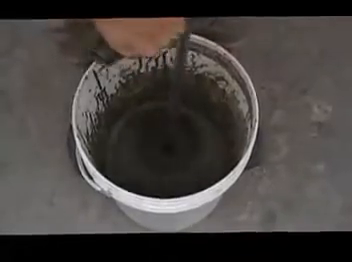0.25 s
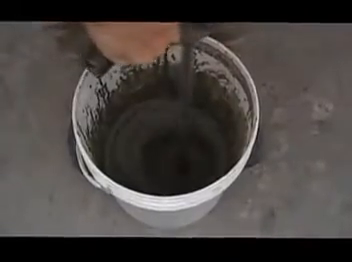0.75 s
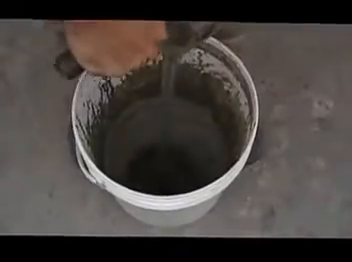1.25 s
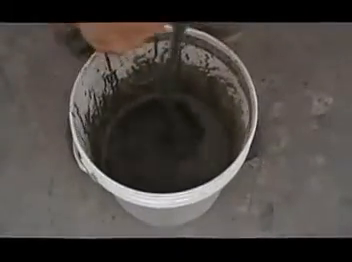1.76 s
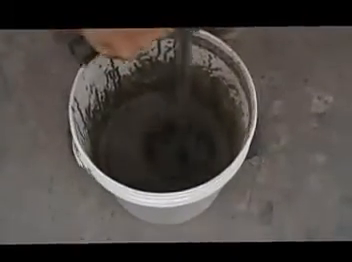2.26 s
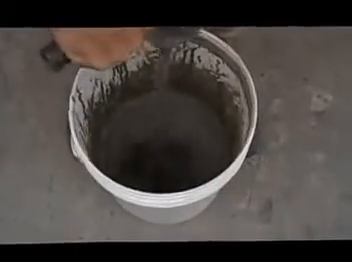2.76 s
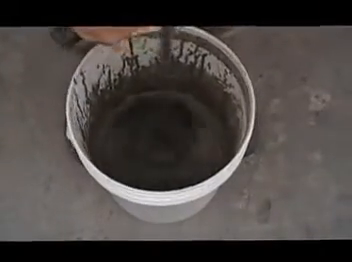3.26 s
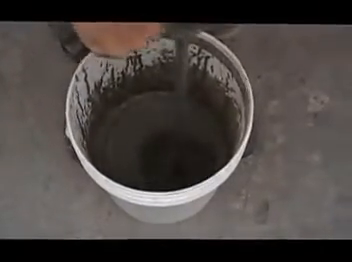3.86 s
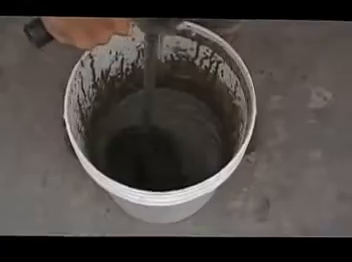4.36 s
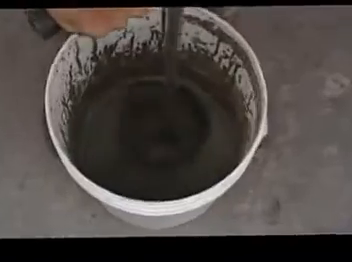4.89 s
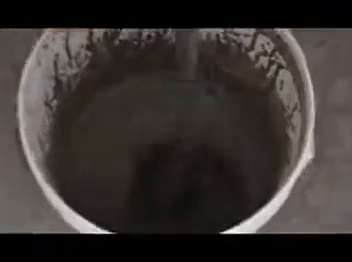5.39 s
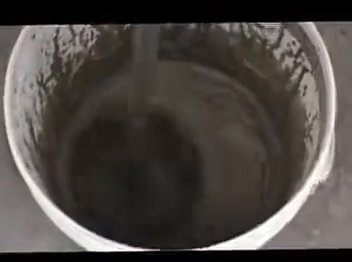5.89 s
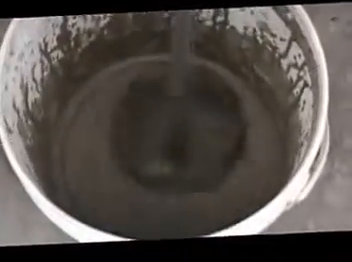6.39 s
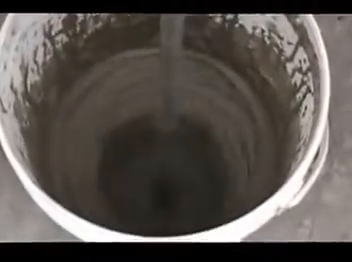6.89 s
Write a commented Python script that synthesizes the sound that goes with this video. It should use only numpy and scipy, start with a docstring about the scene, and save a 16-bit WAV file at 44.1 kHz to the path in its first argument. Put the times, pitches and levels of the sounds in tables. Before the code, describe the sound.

A drill with a mixing paddle revs up fast and holds a hissing, rasping whine while thick paste churns and slaps a bucket.

```python
"""In a room with short reflections, an electric drill turns a mixing paddle in a plastic bucket of mortar.
It coasts for a moment, is switched on and runs up to a whine at multiples of its shaft speed, made of
tones with rough skirts, over shaped noise for fan and brushes. The paddle is led round the bucket:
churning and gear rattle swell near the wall, while listed slaps ring the bucket as decaying tones."""
import sys
import numpy as np
from scipy import signal
from scipy.fft import rfft, irfft
from scipy.io import wavfile
from scipy.ndimage import uniform_filter1d

SR = 44100
rng = np.random.default_rng(int(sys.argv[2]) if len(sys.argv) > 2 else 0)


def to_wav(s):
    """Save 16-bit WAV."""
    ch = np.atleast_2d(s).T  # columns
    pcm = np.round(np.clip(ch, -1, 1) * 32767)  # PCM
    wavfile.write(sys.argv[1], SR, pcm.astype(np.int16))


N = 314874
TIME = np.arange(N) / SR  # s
BINS = np.fft.rfftfreq(N, 1 / SR)  # Hz


def amp(db):
    """Decibels to gain."""
    return 10 ** (np.asarray(db) / 20)


def unit(x):
    """Scales to rms 1."""
    return x / np.sqrt(np.mean(abs(x) ** 2) + 1e-20)


def curves(rows):
    """Every column of a table as a curve over time."""
    s, *columns = np.transpose(rows)
    return [np.interp(TIME, s, column) for column in columns]


def spectrum(points):
    """Joins points on a log-frequency axis."""
    hz, value = np.transpose(points)
    return np.interp(np.log(BINS + 1), np.log(hz), value)


def colour(x, db):
    """Filters by a gain for each frequency."""
    return irfft(rfft(x) * amp(db), N)


def noise(points):
    """Noise of rms 1 with the given spectrum."""
    return unit(colour(rng.standard_normal(N), spectrum(points)))


def wander(rate_hz):
    """Smooth chance of rms 1, moving up to about this rate."""
    steps = rng.standard_normal(N // 16 + 1)  # one step every 16 samples
    hz = np.fft.rfftfreq(len(steps), 16 / SR)
    slow = irfft(rfft(steps) / np.sqrt(1 + (hz / rate_hz) ** 4), len(steps))
    return unit(np.interp(np.arange(N), np.arange(len(steps)) * 16, slow))


def fuzzy(angle, width_hz):
    """A tone smeared into a narrow band, with rms about 1."""
    return wander(width_hz) * np.cos(angle) + wander(width_hz) * np.sin(angle)


def tone(angle, rough, width_hz):
    """A clean line of rms about 1 with a rough skirt."""
    clean = np.sqrt(2) * np.sin(angle + rng.uniform(0, 2 * np.pi))
    return clean + rough * fuzzy(angle, width_hz)


def bump(s, width_s):
    """A smooth swell of height 1 around time s."""
    return np.exp(-.5 * ((TIME - s) / width_s) ** 2)


def bell(hz, width_hz):
    """A resonance curve of height 1."""
    return 1 / (1 + (2 * (BINS - hz) / width_hz) ** 2)


def add(mix, s, sound):
    """Mixes a sound in at time s."""
    part = mix[max(round(s * SR), 0):][:len(sound)]
    part += sound[:len(part)]


FULL_SPEED = 414  # reference speed, turns per s
COAST_SPEED, COAST_S = 215, .74  # speed at the start, turns per s; time constant of the slowing, s
SWITCH_ON_S = .1915
# run-up: a quick kick takes this share of the climb, a slow pull the rest
KICK_SHARE, KICK_S, CLIMB_S = .105, .04, .256
# speed that the load of the mortar allows: time_s [s], speed [turns per s]
LOADED_SPEED = [(1.3, 392), (1.48, 394.6), (1.7, 396), (1.92, 403.5), (2.32, 404.9), (2.74, 402.2),
                (3.2, 404.8), (3.38, 408.2), (4.05, 406.3), (4.48, 408), (4.6, 405.1), (4.76, 407.9),
                (4.96, 411.8), (5.2, 413), (5.46, 410.2), (5.96, 410.6), (6.08, 408), (6.55, 413.6),
                (6.9, 414.6), (7.14, 413.1)]


def speed():
    """Mean turns per second of the motor shaft: it coasts, then runs up to what the load allows."""
    coasting = COAST_SPEED * np.exp(-np.minimum(TIME, SWITCH_ON_S) / COAST_S)
    since = np.maximum(TIME - SWITCH_ON_S, 0)
    lag = KICK_SHARE * np.exp(-since / KICK_S) + (1 - KICK_SHARE) * np.exp(-since / CLIMB_S)
    return lag * coasting + (1 - lag) * curves(LOADED_SPEED)[0]


def slowness():
    """0 at full speed, 1 at half speed and below."""
    return np.clip(2 * (1 - speed() / FULL_SPEED), 0, 1)


def with_speed(growth_db):
    """Level in dB relative to full speed, growing by growth_db per tenfold speed."""
    return growth_db * np.log10(speed() / FULL_SPEED)


def shaft(paddle_hz=13.4, sag_per_s=25, sag_s=0.028):
    """Angle of the motor shaft; lumps and paddle turns make it unsteady, and each slap brakes it briefly."""
    wobble = .0011 * wander(16) + .0008 * fuzzy(2 * np.pi * paddle_hz * TIME, width_hz=2)
    sag = sag_per_s * sum(amp(db) * bump(s, sag_s) for s, db in SLAPS)
    sag = sag - uniform_filter1d(sag, size=SR // 4)  # the quarter-second mean stays level
    return 2 * np.pi * np.cumsum(speed() * (1 + wobble) - sag) / SR


ROUND_S = 1.66  # time of one round, used beyond the first and last listed passes
# closest passes along the wall: pass_s [s], churn_wall_db [dB], churn_free_db half a round later [dB],
# pinion_db before its swing [dB], rattle_db before its bursts [dB]
PASSES_COLUMNS = [(.02, -45, -46.5, -52, -40), (1.6, -33.5, -43.5, -40, -30.5),
                  (3.06, -34.5, -40.5, -38.5, -28), (4.62, -38, -41.5, -36, -31),
                  (6.1, -35, -50, -41.5, -28)]


def at_wall(lag_s=0):
    """1 as the paddle passes the wall, 0 half a round later."""
    times = [row[0] for row in PASSES_COLUMNS]
    times = [times[0] - ROUND_S, *times, times[-1] + ROUND_S]
    rounds = np.interp(TIME - lag_s, times, np.arange(len(times)))
    return np.cos(np.pi * rounds) ** 2


# listening position: time_s [s], nearness [0 above the rim, 1 closer in]
LISTENING = [(0, 0.37), (1, 0), (4.7, 0.14), (5.5, 0.94), (7.14, 0.86)]


def nearness():
    """How close the listening point is to the bucket and drill."""
    return curves(LISTENING)[0]


SWEEP_FLICKER_DB = 4.5  # scale of the flicker at half speed
# peaks and dips of the drill housing: centre_hz [Hz], width_hz [Hz], gain_db [dB]
HOUSING_PEAKS = [(1380, 140, -15), (1680, 260, 2), (2550, 250, 4.5), (3520, 520, -3), (3980, 240, 3.5),
                 (4420, 79, -16), (4600, 50, 4), (4853, 290, 7.5), (5820, 120, 12), (8400, 280, 6),
                 (8975, 70, -14), (9180, 150, 4.5), (9830, 150, 1)]


def housing(order):
    """Gain in dB on a multiple of the shaft speed as it sweeps housing peaks and room standing waves."""
    response_db = sum(db * bell(hz, width) for hz, width, db in HOUSING_PEAKS)
    flicker_db = SWEEP_FLICKER_DB * np.sqrt(slowness()) * np.tanh(wander(11))
    return np.interp(order * speed(), BINS, response_db) + flicker_db


def lull(centre_s=0.19, width_s=0.058, change_db=-5.5):
    """Level in dB of the high whines: they die back around the slowest moment and build up under power."""
    return change_db * bump(centre_s, width_s)


# whine before speed, housing, flicker and lull act: time_s [s], slots_db [dB], bars_db [dB]
WHINE_LEVELS = [(0, -27, -29), (.5, -24.5, -24), (1.55, -30.5, -25), (1.75, -26, -27.5),
                (2.65, -25.5, -24.5), (2.94, -25.5, -20), (3.85, -27, -26.5), (4.1, -25.5, -25),
                (4.45, -27, -21.5), (4.66, -26.5, -24), (4.78, -30.5, -24), (4.97, -23, -20.5),
                (5.26, -26.5, -29), (5.5, -33, -25.5), (5.8, -25.5, -22), (6.19, -29.5, -25.5),
                (6.35, -24.5, -28), (7.14, -27, -26.5)]
# brief dips of the slot whine: centre_s [s], width_s [s], change_db [dB]
SLOT_DIPS = [(1.0, .02, -12), (4.51, .008, -10), (6.05, 0.022, -8), (6.19, .02, -5)]


def whine(angle, slots_growth_db=26, bars_growth_db=20, slots_flicker_db=0.82, bars_flicker_db=1.23):
    """The 12 armature slots and 24 commutator bars each sing once per passing, louder with speed."""
    slots_db, bars_db = curves(WHINE_LEVELS)
    slots_db = slots_db + with_speed(slots_growth_db) + housing(order=12)
    slots_db = slots_db + slots_flicker_db * wander(9.8)
    slots_db = slots_db + sum(db * bump(s, width_s) for s, width_s, db in SLOT_DIPS)
    bars_db = bars_db + with_speed(bars_growth_db) + housing(order=24)
    bars_db = bars_db + bars_flicker_db * wander(7.9)
    slots = amp(slots_db) * tone(12 * angle, rough=0.18, width_hz=35)
    bars = amp(bars_db) * tone(24 * angle, rough=0.35, width_hz=67.0)
    return amp(lull()) * (slots + bars)


# thin squeal of the brushes: time_s [s], pitch_hz [Hz], level_db [dB]
SQUEAL_TRACK = [(0, 11650, -43), (.25, 11620, -41), (.7, 11900, -38), (2, 12060, -39), (5, 11900, -47),
                (7.14, 12030, -54)]


def brush_squeal():
    """The brushes squeal thinly in a narrow band on a drifting pitch of their own."""
    pitch_hz, level_db = curves(SQUEAL_TRACK)
    return amp(level_db) * fuzzy(2 * np.pi * np.cumsum(pitch_hz) / SR, width_hz=49)


def brush_holders(ring_hz=8330, coast_db=-23.5, driven_db=-35, fade_s=.15):
    """The brush holders ring drily while the motor coasts and fade back under power."""
    coasting = np.exp(-np.maximum(TIME - SWITCH_ON_S, 0) / fade_s)
    level_db = coasting * coast_db + (1 - coasting) * driven_db
    return amp(level_db) * fuzzy(2 * np.pi * ring_hz * TIME, width_hz=99)


PINION_SETTLES, PINION_SETTLE_WIDTH = 389.4, 6.6  # it quietens around this speed, turns per s
PINION_SLOW_DB = -25  # 8th order at low speed, before the housing
PINION_SWING_DB, PINION_LAG_S = 7.5, 0.49  # swing either way over a round; delay of its peak after a pass
# 16th order: level from far and near, before speed and housing; growth per tenfold speed
OVERTONE_FAR_DB, OVERTONE_NEAR_DB, OVERTONE_GROWTH_DB = -33.5, -29, 13
# the 16th order flares as the teeth take up around switch-on
TAKE_UP_AT_S, TAKE_UP_S, TAKE_UP_DB = 0.179, 0.048, 19.5


def pinion(angle, paddle, flutter_db=2):
    """The four-tooth pinion sings at low speed; at high speed it flutters and swells after each wall pass."""
    near = nearness()
    slow = .5 - .5 * np.tanh((speed() - PINION_SETTLES) / (2 * PINION_SETTLE_WIDTH))
    s, _, _, pinion_db, _ = np.transpose(PASSES_COLUMNS)
    running_db = np.interp(TIME, s + PINION_LAG_S, pinion_db)
    running_db = running_db + PINION_SWING_DB * (2 * at_wall(PINION_LAG_S) - 1)
    running_db = running_db + flutter_db * np.cos(4 * paddle)
    second_db = slow * PINION_SLOW_DB + (1 - slow) * running_db + housing(order=8)
    fourth_db = (1 - near) * OVERTONE_FAR_DB + near * OVERTONE_NEAR_DB + housing(order=16)
    fourth_db = fourth_db + with_speed(OVERTONE_GROWTH_DB) + lull()
    fourth_db = fourth_db + TAKE_UP_DB * bump(TAKE_UP_AT_S, TAKE_UP_S)
    second = amp(second_db) * tone(8 * angle, rough=0.4, width_hz=200)
    fourth = amp(fourth_db) * tone(16 * angle, rough=0.57, width_hz=80)
    contact = unit(amp(2.2 * np.tanh(wander(18))))  # tooth contact comes and goes
    return (second + fourth) * contact


# relative spectrum of the fan air: freq_hz [Hz], density_db [dB per Hz]
AIR_SPECTRUM = [(20, -42), (90, -41), (170, -29.5), (270, -10.5), (450, -17), (700, -5), (1080, 3),
                (1350, -1), (1800, 3.5), (2400, -1), (3050, -0.5), (3500, -3.5), (4300, -0.5), (9000, -5),
                (14000, -45)]
# relative spectrum of the brush hiss: freq_hz [Hz], density_db [dB per Hz]
BRUSH_SPECTRUM = [(500, -42), (2500, -13), (4300, -12.5), (5200, -4.5), (6100, -1), (6900, -2),
                  (7700, -1.5), (8300, 1), (9000, -2.5), (9600, -3), (10200, -5.5), (11500, -12),
                  (13000, -16.5), (15000, -41)]
# brief surges of the hiss and air: centre_s [s], change_db [dB]
RUSH_SURGES = [(4.12, 0.8), (4.41, 1), (4.86, 1.6)]
# hollow of bucket and housing, heard above the rim and closer in:
# centre_hz [Hz], width_hz [Hz], far_db [dB], near_db [dB]
HOLLOW_PEAKS = [(816, 96, -1.5, 7.5), (1230, 160, -1, -5.5), (2120, 390, 0, -4), (2720, 124, 1, 4.5),
                (3800, 180, 4, 3.5), (4170, 190, 3, 4), (7670, 380, 0.5, 3), (9350, 290, 2.5, 2)]
AIR_DB, AIR_GROWTH_DB = -21, -1.5  # level before swelling and colouring; growth per tenfold speed
HISS_DB, HISS_GROWTH_DB = -18.5, -1
RUSH_WALL_DB, RUSH_NEAR_DB = -0.76, 0.84  # change at the wall and from near
# vent hiss that fades as the fan slows: centre and width of its band
FAN_HZ, FAN_WIDTH_HZ = (4000, 2200)


def rush(paddle, slow_db=-8, surge_s=0.029, drift_db=.3):
    """Fan air and brush hiss pulse with the paddle; the hollow of bucket and housing colours them."""
    near = nearness()
    swell_db = RUSH_WALL_DB * at_wall() + RUSH_NEAR_DB * near + drift_db * wander(6.4)
    swell_db = swell_db + sum(db * bump(s, surge_s) for s, db in RUSH_SURGES)
    throb = np.cos(5 * paddle) + np.cos(4 * paddle)
    flutter = wander(27)
    air_db = AIR_DB + with_speed(AIR_GROWTH_DB) + 0.54 * flutter + .25 * throb
    hiss_db = HISS_DB + with_speed(HISS_GROWTH_DB) + 0.86 * flutter + .5 * throb
    both = amp(swell_db) * (amp(air_db) * noise(AIR_SPECTRUM) + amp(hiss_db) * noise(BRUSH_SPECTRUM))
    slow_fan = colour(both, slow_db * bell(FAN_HZ, FAN_WIDTH_HZ) ** 2)
    both = (1 - slowness()) * both + slowness() * slow_fan
    from_far = colour(both, sum(far_db * bell(hz, width) for hz, width, far_db, _ in HOLLOW_PEAKS))
    from_near = colour(both, sum(near_db * bell(hz, width) for hz, width, _, near_db in HOLLOW_PEAKS))
    return (1 - near) * from_far + near * from_near


def churn_level(sharpness=1.4):
    """Level in dB of the stirring, following the listed wall and free levels round by round."""
    s, wall_db, free_db, _, _ = np.transpose(PASSES_COLUMNS)
    wall = at_wall() ** sharpness
    return wall * np.interp(TIME, s, wall_db) + (1 - wall) * np.interp(TIME, s + ROUND_S / 2, free_db)


# relative spectrum of the stirred paste: freq_hz [Hz], density_db [dB per Hz]
CHURN_SPECTRUM = [(20, -38), (80, -45), (110, -23), (135, -14), (200, -4.5), (262, 3), (340, -2.5),
                  (460, -12.5), (620, -2), (1000, -8.5), (3000, -39)]


def churn(paddle):
    """Two blades churn the paste in lumps: low noise pulsing twice a paddle turn and at random."""
    lumps = amp(0.71 * np.cos(2 * paddle) + 2 * wander(25))
    return amp(churn_level()) * unit(noise(CHURN_SPECTRUM) * lumps)


def bucket_hum(hum_hz=112, free_db=-59.5, wall_db=-66, growth_db=80):
    """The bucket hums in a narrow low band, growing steeply with speed and softer at the wall."""
    wall = at_wall()
    level_db = wall * wall_db + (1 - wall) * free_db + with_speed(growth_db)
    return amp(level_db) * fuzzy(2 * np.pi * hum_hz * TIME, width_hz=4.4)


# relative spectrum of the wet smacks of the paste: freq_hz [Hz], density_db [dB per Hz]
SMACK_SPECTRUM = [(150, -24), (350, -4), (620, -0.5), (1100, 0), (2200, -3), (5000, -14), (10000, -37)]


def smacks(per_s=260, spread_db=4, length_s=0.0049):
    """Air pockets in the paste burst as tiny wet puffs, harder when the churning is strong."""
    strength = amp(spread_db * np.minimum(rng.exponential(1, N), 4))
    pops = (rng.random(N) < per_s / SR) * strength
    power = signal.lfilter([1], [1, -np.exp(-1 / (length_s * SR))], pops ** 2)  # power dies in length_s
    return amp(0.58 * churn_level() - 12.5) * unit(np.sqrt(power) * noise(SMACK_SPECTRUM))


RATTLE_FREE_DB, RATTLE_LAG_S = -37.5, 0.11  # level away from the wall, before bursts; delay after a pass
# hard knocks of the gear teeth: centre_s [s], drive_db before the tooth mix [dB]
GEAR_KNOCKS = [(1.416, -11.5), (1.493, -10), (1.617, -11), (1.652, -10), (1.708, -10), (3.015, -13),
               (4.527, -12), (4.561, -9), (4.58, -10), (5.895, -13), (6.18, -17), (6.635, -13)]
GEAR_MESH = 1.423  # meshings of the second gear stage per turn of the motor


def rattle(angle, paddle, knock_s=0.0024, sharpness=1.3):
    """Loose teeth chatter in bursts, several to a paddle turn, swelling after wall passes; some knock hard."""
    wall = at_wall(RATTLE_LAG_S) ** sharpness
    level_db = wall * curves(PASSES_COLUMNS)[-1] + (1 - wall) * RATTLE_FREE_DB
    beats = np.cos(4 * paddle) + np.cos(5 * paddle)
    bursts = amp(level_db) * unit(amp(6.6 * beats + 6.9 * np.tanh(wander(51))))
    middle, high, stage = 8 * angle, 16 * angle, 3 * GEAR_MESH * angle
    chatter = amp(0.5) * fuzzy(high, width_hz=470)
    chatter = chatter + amp(-6.5) * fuzzy(middle, width_hz=90)
    chatter = chatter + amp(-11) * fuzzy(stage, width_hz=74)
    knocks = sum(amp(db) * bump(s, knock_s) for s, db in GEAR_KNOCKS)
    teeth = 0.9 * np.sin(high) + 0.32 * np.sin(middle) + 0.38 * noise(BRUSH_SPECTRUM)
    return bursts * chatter + knocks * teeth


def gear_stage(angle, second_db=-38.5, third_db=-31.5, near_db=-14, growth_db=54, contact_db=2.5):
    """The second gear stage sings on its 2nd and 3rd mesh harmonics; near_db changes the 2nd from near."""
    low_db = second_db + near_db * nearness()
    low = amp(low_db) * tone(2 * GEAR_MESH * angle, rough=0.97, width_hz=63)
    high = amp(third_db) * tone(3 * GEAR_MESH * angle, rough=0.68, width_hz=60)
    contact = unit(amp(contact_db * np.tanh(wander(25))))  # tooth contact comes and goes
    return contact * (low + high) * amp(with_speed(growth_db))


# faint lines of gears and armature: order [multiples of the shaft speed]
FAINT_LINE_ORDERS = [1.423, 2, 3, 5.69, 9.42, 18.84, 36]
# their levels at full speed, before the rough skirt: level_db [dB]
FAINT_LINE_LEVELS = [-50, -47, -45, -45, -42, -43, -52]


def faint_lines(angle):
    """Faint lines of gears and armature grow with the cube of the speed."""
    lines = sum(amp(db) * tone(order * angle, rough=0.72, width_hz=10.5)
                for order, db in zip(FAINT_LINE_ORDERS, FAINT_LINE_LEVELS))
    return lines * (speed() / FULL_SPEED) ** 3


# mortar slapped against the wall: start_s [s], ring_peak_db [dB]
SLAPS = [(1.11, -30), (1.343, -28), (1.544, -23), (1.619, -25.5), (1.655, -25), (1.711, -21.5), (2.09, -33),
         (2.574, -31), (2.631, -26.5), (2.851, -24), (2.928, -28), (3.094, -28), (3.175, -24),
         (3.395, -25.5), (3.627, -28.5), (4.397, -26.5), (4.516, -21.5), (4.661, -23), (4.841, -28),
         (5.895, -21.5), (5.99, -22), (6.117, -24), (6.245, -26.5), (6.386, -25)]
# nominal modes of the filled bucket: pitch_hz [Hz], relative level_db [dB], t60_s [s]
BUCKET_MODES = [(158, -15.5, .07), (198, -3, 0.035), (264.5, -4, 0.085), (336, -1, 0.046),
                (405, -20, 0.025), (585, 1, 0.036)]


def slaps(swell_s=0.0056, splat_s=0.015):
    """Soft, wet slaps of paste ring the damped bucket, each slightly detuned, with a short splat of noise."""
    out = np.zeros(N)
    t = np.arange(SR // 5) / SR
    wet = noise(SMACK_SPECTRUM)
    swell = 1 - np.exp(-(t / swell_s) ** 2)
    chances = rng.random((len(SLAPS), len(BUCKET_MODES), 2))
    for (s, db), chance in zip(SLAPS, chances):
        ring = np.zeros(len(t))
        for (hz, level_db, t60_s), (detune, start) in zip(BUCKET_MODES, chance):
            turns = hz * (0.922 + .14 * detune) * t + start
            ring += amp(level_db - 60 * t / t60_s) * np.sin(2 * np.pi * turns)
        splat = amp(-1.5) * wet[round(s * SR):][:len(t)] * np.exp(-t / splat_s)
        add(out, s, amp(db) * swell * (ring / abs(swell * ring).max() + splat))
    return out


# left against right: freq_hz [Hz], left_minus_right_db [dB]
STEREO_TILT = [(60, -4), (600, -5.5), (950, -2.5), (1600, -2.5), (2200, 1.5), (4900, -0.5), (6200, -1.1),
               (7700, -0.7), (9700, -3), (11000, -0.5), (13000, -0.5)]
# room reflections before a 0.5 dB trim: freq_hz [Hz], level_db [dB]
REFLECTIONS = [(40, -3), (130, -12), (260, -16), (450, -9), (900, -13), (1700, -17), (2500, -23),
               (3500, -16), (5000, -17), (8000, -14), (9500, -10), (10300, -6), (12000, -10), (14500, -7)]


def microphones(x, room_t60_s=.2, taps_per_s=3000):
    """Floor and wall reflections, as sparse decaying taps, reach the two ports with opposite sign."""
    t = np.arange(SR // 3) / SR
    taps = rng.choice([-1., 1.], len(t)) * (rng.random(len(t)) < taps_per_s / SR)
    taps = taps * amp(-60 * t / room_t60_s)
    reflected = signal.fftconvolve(x, taps / np.linalg.norm(taps))[:N]
    side = colour(reflected, spectrum(REFLECTIONS) - .5)
    tilt_db = spectrum(STEREO_TILT) / 2
    return np.array([colour(x + side, tilt_db), colour(x - side, -tilt_db)])


def scene():
    """One shaft drives drill and paddle; the paddle turns about thirty times slower."""
    angle = shaft()
    paddle = angle / 30.3
    motor = whine(angle) + brush_squeal() + brush_holders()
    gears = pinion(angle, paddle) + rattle(angle, paddle) + gear_stage(angle) + faint_lines(angle)
    mortar = churn(paddle) + bucket_hum() + smacks() + slaps()
    return microphones(motor + gears + rush(paddle) + mortar)


def record(dry, low_cut_hz=105, edge_hz=15100):
    """Cuts the bass, adds a trace of handling rumble, rounds the peaks and limits the band."""
    cut = signal.sosfilt(signal.butter(2, low_cut_hz, "highpass", fs=SR, output="sos"), dry)
    rumble = amp(-76) * np.array([noise([(15, 0), (80, 1), (200, -15), (1000, -50)]) for _ in dry])
    rounded = cut / (1 + (cut / .88) ** 8) ** (1 / 8)
    band_limit = signal.firwin(511, edge_hz, window=("kaiser", 9), fs=SR)
    return signal.oaconvolve(rounded + rumble, band_limit[None], "same")


dry = scene()
out = record(dry)
to_wav(out)
```